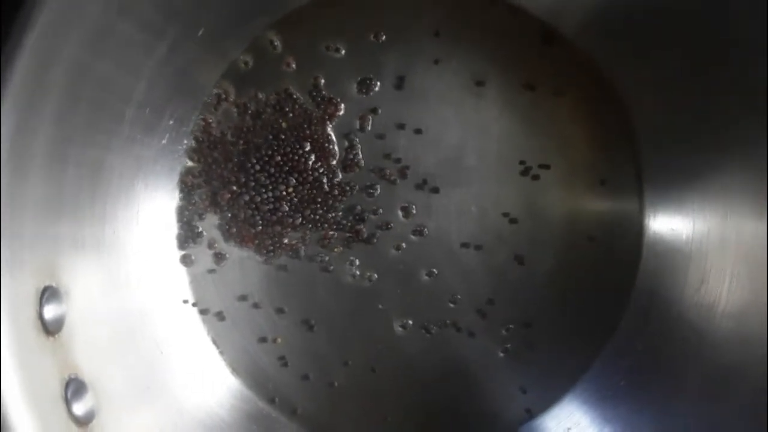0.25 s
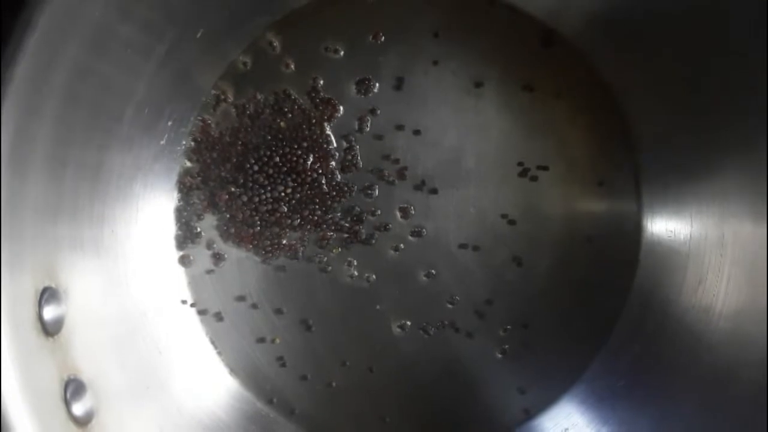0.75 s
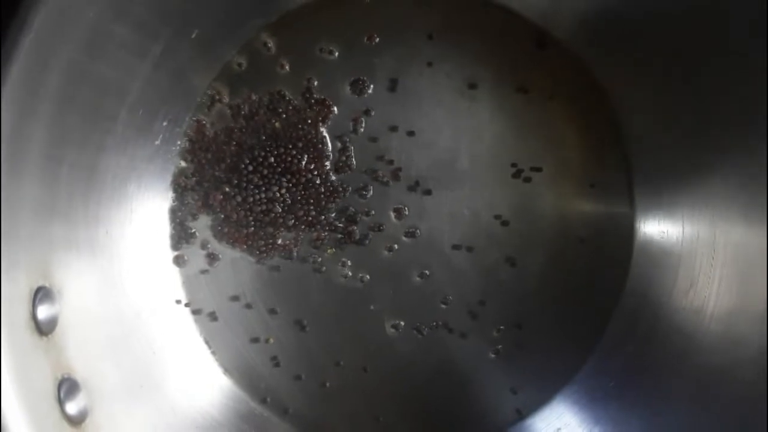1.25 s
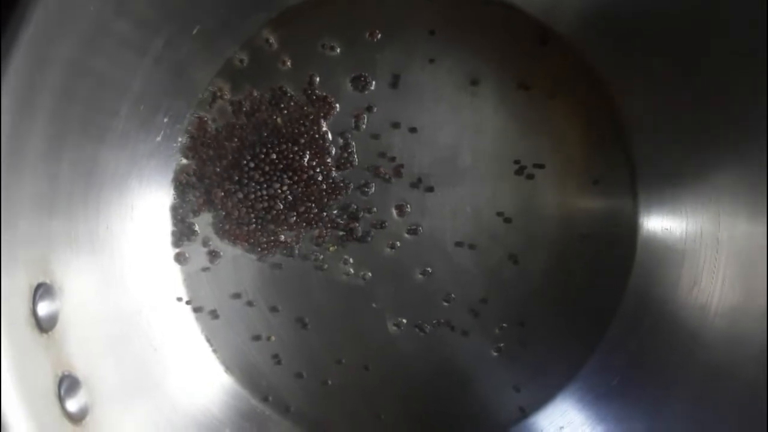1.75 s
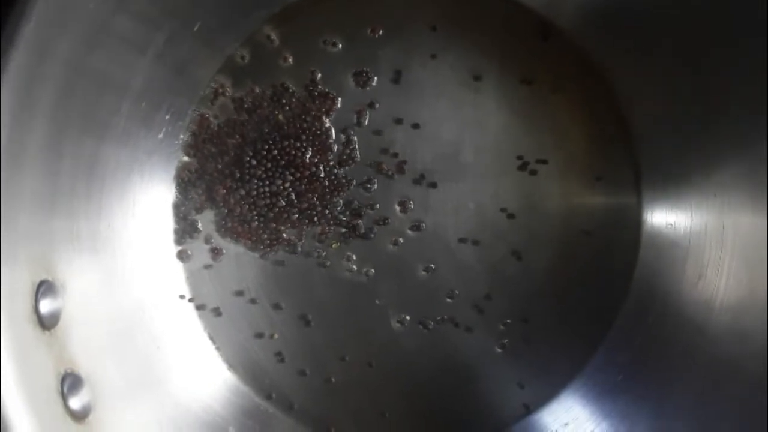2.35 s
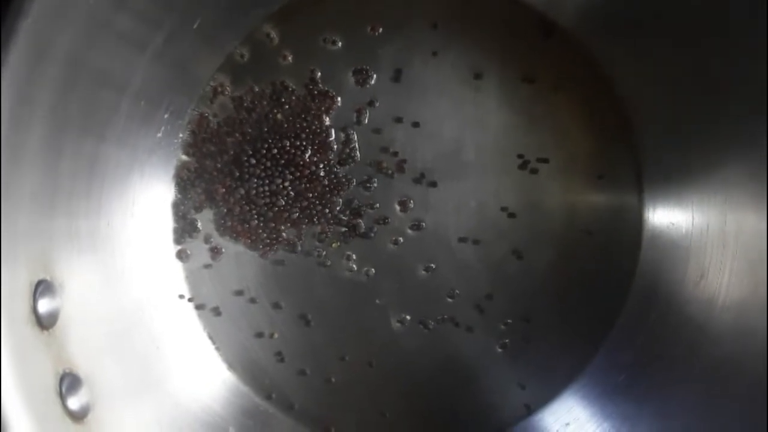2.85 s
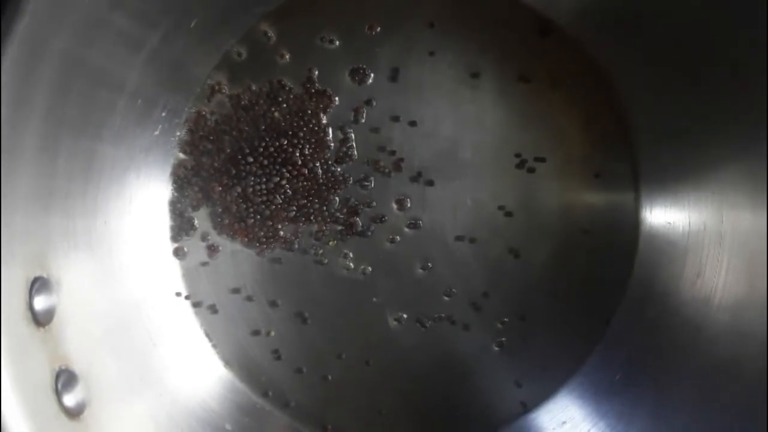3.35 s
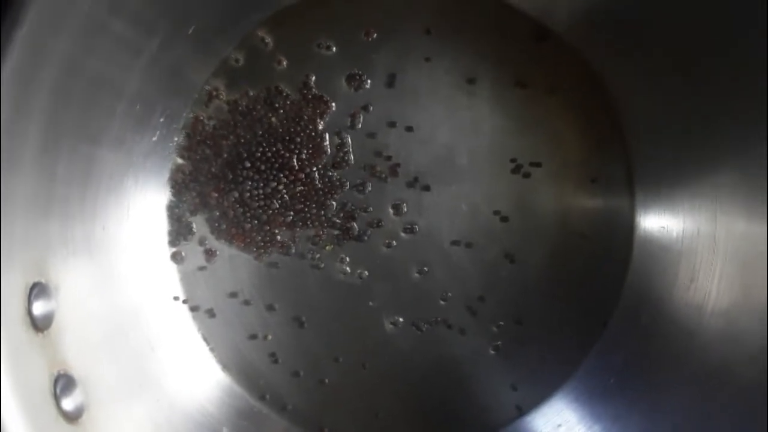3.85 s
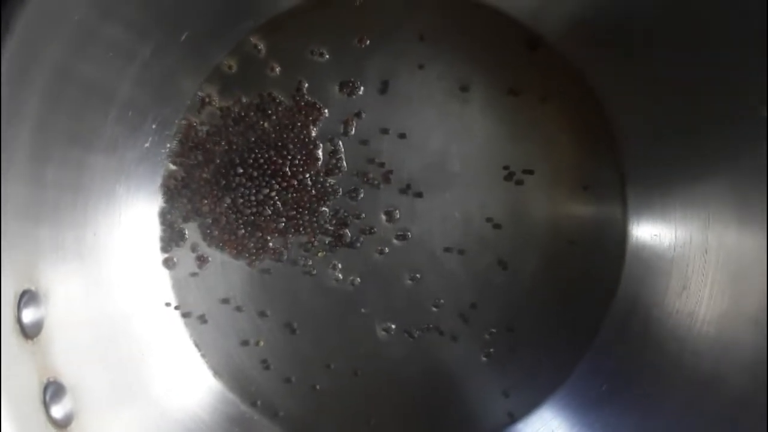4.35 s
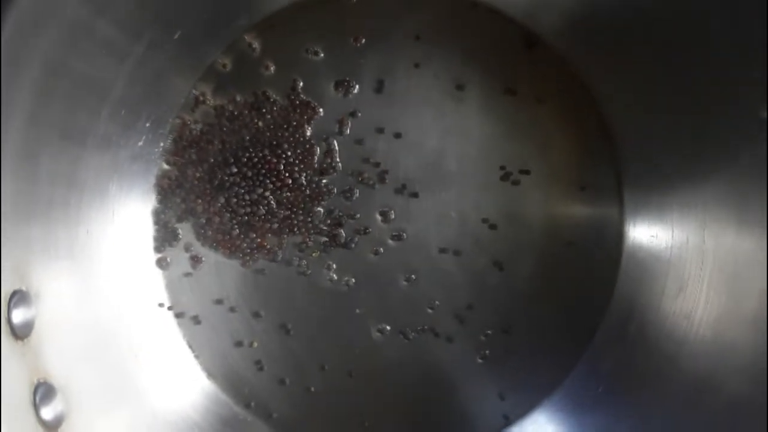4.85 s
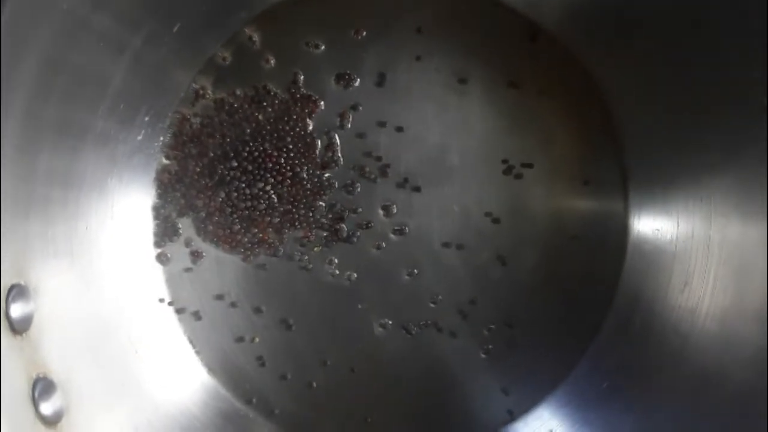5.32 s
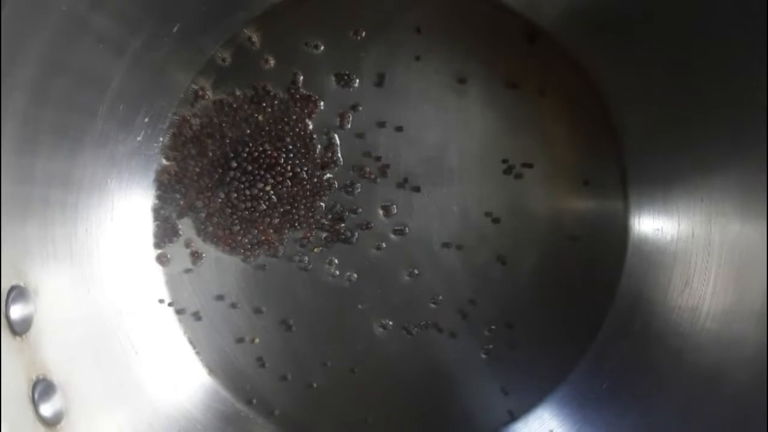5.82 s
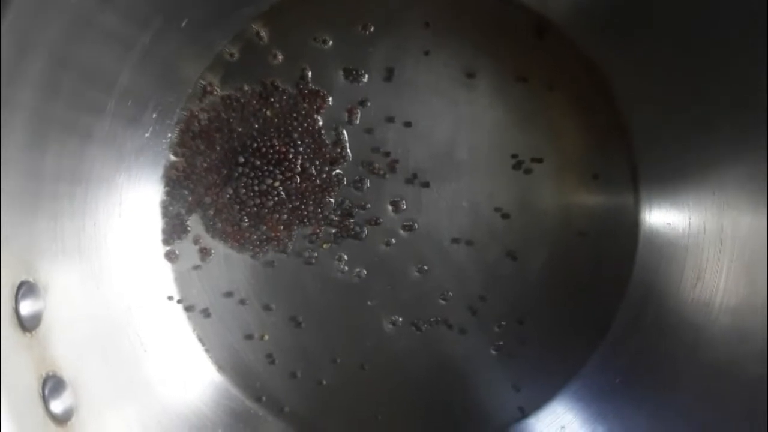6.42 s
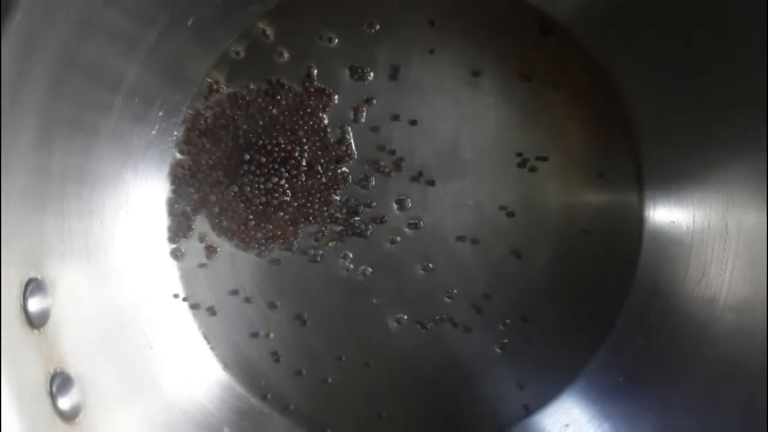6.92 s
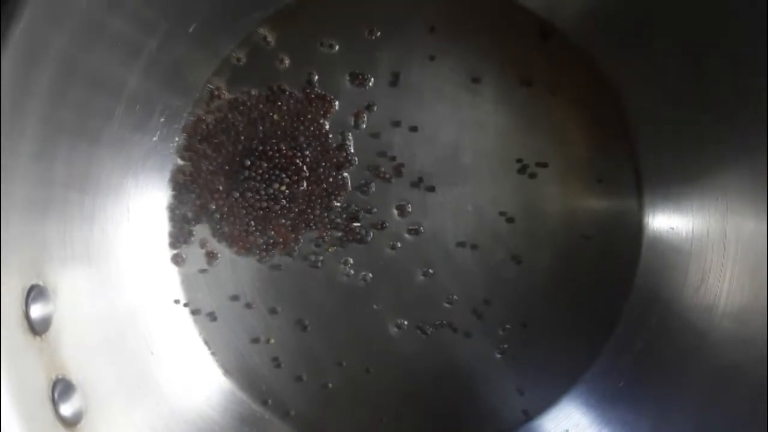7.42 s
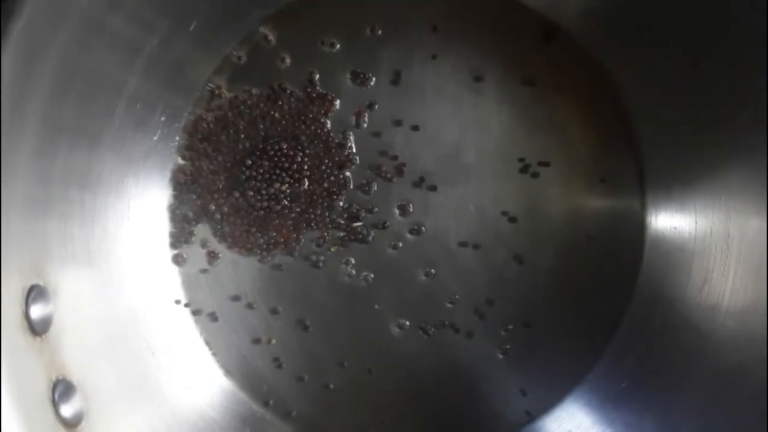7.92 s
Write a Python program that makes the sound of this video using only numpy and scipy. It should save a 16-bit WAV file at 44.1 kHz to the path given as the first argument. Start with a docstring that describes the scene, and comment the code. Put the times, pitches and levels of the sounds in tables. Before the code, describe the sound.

Close over a deep steel pot in a bare home kitchen, with constant low rumble and faint hiss. At first it is nearly quiet, with a tiny spurt near 0.2 s, then a tight flurry of seed pops and sizzle from 0.6 to 1.0 s. After a short gap, light crackles and a soft fry return from 1.4 to 2.0 s, with a plop near 1.9 s. Small spits and bubble plops gather between 2.3 and 3.4 s. From 3.8 s popping becomes dense and thumpier, peaking around 4.2 to 4.5 s with a strong sizzle and the loudest plop. Another surge with sharp snaps runs 4.9 to 5.3 s, then a lull. Near 5.9 s boiling bursts up, peaks at 6 s, dips around 6.5 s, and continues as steadier sizzling with scattered cracks, one strong at 7.5 s, until about 8.2 s. Every pop has a short metallic rattle and room tail.

```python
"""A low rumble and faint hiss run throughout, under pitched plops, seed pops and surges of sizzling.
Mustard seeds fry in hot oil in a deep steel pot: shaped noise bursts make each pop and spit.
Dense random bursts make the sizzle, in short surges over a boil that takes hold near 6 s.
Plops are decaying sines. Noise echoes carry the rattle of the steel wall and the bare kitchen's tail."""
import sys
import numpy as np
from scipy import signal
from scipy.fft import rfft, irfft, next_fast_len
from scipy.io import wavfile
from scipy.ndimage import map_coordinates

SR = 44100
rng = np.random.default_rng(int(sys.argv[2]) if len(sys.argv) > 2 else 0)


def log_audio(samples):
    """Write samples as a 16-bit WAV file to the path given in sys.argv[1]."""
    # one column per channel
    frames = np.atleast_2d(samples).T
    # limit to full scale, then quantise
    limited = np.clip(frames, -1, 1)
    pcm = np.round(limited * 32767).astype(np.int16)
    wavfile.write(sys.argv[1], SR, pcm)


N = 360738  # length [samples]

# rumble spectrum, relative: (frequency [Hz], level [dB])
RUMBLE_SPECTRUM = [(15, -55), (25, -37), (40, -12), (65, -12.5), (92, 1.5), (125, -4), (160, -9.5),
                   (300, -16.5), (800, -79)]
# drift of the rumble, before its offset: (time [s], level [dB])
RUMBLE_DRIFT = [(0, -67.5), (0.25, -63), (0.75, -71), (1.8, -65.5), (2.2, -68.5), (5.3, -70), (7.3, -72.5),
                (8.18, -69)]
# hiss spectrum, relative: (frequency [Hz], level [dB])
HISS_SPECTRUM = [(200, -8.5), (400, -5), (800, -9.5), (1400, -10), (2150, -17.5), (3000, -22), (4200, -21),
                 (5000, -7.5), (5700, -4.5), (6700, -14.5), (8400, -61), (10000, -22.5), (12000, -9),
                 (15500, -9)]
# bursting large bubbles: (time [s], peak before the mix [dB], pitch [Hz])
PLOPS = [(0.096, -48, 2100), (0.459, -48, 1610), (1.396, -49, 2480), (1.939, -31.5, 2400),
         (2.356, -38.5, 1440), (2.726, -42, 2240), (2.855, -35, 1490), (3.092, -31.5, 1260),
         (3.263, -33.5, 1245), (3.342, -24.5, 2010), (3.514, -43.5, 2580), (3.992, -26, 1520),
         (4.457, -17, 1610), (5.231, -25.5, 2230), (5.756, -49, 2150), (6.770, -23, 2290)]
# steam surges: (time [s], seething [dB], hold [s], splutter offset [dB], fizz offset [dB])
SURGES = [(0.23, -59, 0.013, -0.5, -6.5), (0.47, -72.5, 0.1, 7.5, -10), (0.759, -52.5, 0.16, 7.5, 0),
          (1.15, -69.5, 0.06, -11, 9), (1.62, -63.5, .04, -4, 6.5), (1.718, -55, 0.33, -0.5, 2.5),
          (2.362, -57.5, 0.16, -4.5, 0), (2.839, -49, 0.039, 0, 1), (3.08, -51.5, 0.19, 1, 1.5),
          (3.50, -60, 0.028, 4, -18), (3.868, -50, 0.33, -0.5, 1), (4.348, -39.5, 0.1, 1, 5.5),
          (4.62, -61, 0.017, 15, -7), (4.79, -64, 0.044, -6, 7), (4.889, -47.5, 0.38, 0.5, 2),
          (5.552, -75, 0.026, -8, -13)]
# boil beneath the surges: (time [s], seething [dB])
BOIL = [(0, -79.5), (5.71, -81), (5.85, -44), (5.99, -34.5), (6.12, -40.5), (6.27, -42), (6.5, -51),
        (6.95, -45), (7.35, -43.5), (7.8, -42.5), (8.18, -46)]
# louder seeds: (time [s], echo level before pot and mix [dB], direct crack over the echo [dB],
# then against the snap: thump [dB], knock [dB], air [dB])
LOUD_POPS = [ (0.598, -15, -4, -6, -10, -12), (0.603, -8.5, -16, 1, 2.5, -9),
             (0.635, -13.5, -19, -1, 10.5, -9), (0.722, -17.5, -3.5, -7, 5.5, -1),
             (0.769, -20.5, 6.5, -6, 9, -6), (0.789, -6.5, -3.5, -18, -13, 1.5),
             (0.804, -16.5, 1.5, -1, 20, -9), (0.891, -19, -0.5, 0, 18.5, -2),
             (0.903, -4.5, -12, -8, -18, -7), (0.927, -4, -11, -7, -18, -10), (0.944, -1, -0.5, 1, 2, 3),
             (0.991, -10.5, -5, 2, 6, -12), (1.397, -21, -11, -10, -24, -13),
             (1.600, -19, -20, 2, -18, -12), (1.730, -11.5, -4, -2, -8.5, -9),
             (1.770, -8, -12, -6, -8, -4.5), (1.799, -20, 2, 7, -3, -4), (1.866, -23, -2, 5, -5, -7),
             (1.911, -11, -23, 4, -7, -4), (1.940, -10.5, -7, -4, -0.5, -5),
             (2.295, -19.5, 5.5, -8, -16, -5), (2.503, -10, -29, -11, -2, -9),
             (2.518, -11, -20, -4, 5.5, -7), (2.540, -12, -3.5, 5, 8.5, -8), (2.811, -9, -27, -27, -9, -12),
             (2.869, -8.5, -2.5, -21, -4.5, -20), (3.077, -1, -16, 5.5, -12, -9.5),
             (3.249, -8, -26, 5, -8, -22), (3.318, -2.5, -19, 0, -3, -8.5), (3.340, -12.5, -1, 8, 3.5, -21),
             (3.843, -11.5, -23, 15, 1.5, -4), (3.870, -7.5, -21, 7, 1, -12), (3.908, -5.5, -0.5, 5, 0, -8),
             (3.992, -29, -10, 13, 21, -11), (4.017, -14, 8, 3, 4.5, -10), (4.061, -8, -4, 12.5, 8, -9),
             (4.158, -14, -4, -8, 8, -14), (4.166, -14, -2, 13, 10, 1), (4.183, -3, -3, 8.5, 1.5, -4),
             (4.225, -21.5, -5, -13, 17, -12), (4.288, -1, -15, 7, 4.5, -4), (4.309, 0.5, -24, 11, 6.5, 2),
             (4.351, 3.5, -16, 3, -8, 2), (4.390, -0.5, -21, 10, 8.5, 4.5),
             (4.458, -0.5, -6.5, 19.5, 8.5, 1), (4.470, 3, -5, 9, -12.5, -17),
             (4.618, 0.5, -3, -17, -18, -4.5), (4.899, -0.5, -38, 3, -1.5, -7),
             (4.959, -15.5, 0, -15, 6.5, 1), (5.031, -19, 4, -8, 0, 2), (5.077, 3, -6, -13, -4.5, 1),
             (5.141, -12, 1, -6, -11, -3), (5.156, -11, -0.5, -11, 1.5, 0), (5.230, -5.5, -2, 8, 0, 2),
             (5.339, 1, -22, 4.5, -4.5, 5.5), (5.344, 1, -9.5, 1, -23, -19),
             (6.301, -11.5, 0.5, -13, -3, -7), (6.618, -6.5, -11, -7, 8, -1),
             (6.626, -23, 6.5, -13, 10, -1), (6.662, -30.5, 14, -1, 13, -3), (6.726, 0.5, 0, -23, -29, -11),
             (6.770, -10, -4, -12, 2, 2), (6.785, -3.5, -8, -24, 2, -2), (6.832, -5, -24, -6, 4.5, -6),
             (7.051, -2.5, -8, -23, 3.5, -10), (7.099, -2.5, -6, -6, 9.5, 0),
             (7.411, -11, -3.5, -52, 9, -2), (7.526, -3, -22, -1, 9.5, -2), (7.543, 4, -9, 1, -2, -4),
             (7.748, -17, -15, 1, 9, -1), (7.768, -8, -7.5, -16, 7.5, -6), (7.846, -6, -7, -44, 6, -6),
             (7.927, -10.5, 4, -11, -1, -30), (8.121, -24, -2, -3, 20.5, -23)]
# centres of a seed's colour bands: thump, knock, body, snap, air [Hz]
COLOUR_HZ = [300, 950, 2200, 5400, 12500]
# broad tone of the pot, relative: (frequency [Hz], level [dB])
POT_TONE = [(120, -28.5), (300, -21.5), (600, -13.5), (900, -10.5), (1400, -1.5), (2200, -1.5),
            (3000, -5.5), (3700, -9.5), (5500, 0.5), (7000, -9.5), (8700, -25), (11000, -15.5),
            (14000, -12), (15500, -7.5)]
# narrow pot resonances: (frequency [Hz], width [Hz], level over the broad tone [dB])
POT_MODES = [(240, 15, 0), (432, 49, -2.5), (763, 23, -2.5), (925, 3.2, 4), (1066, 3.1, 4.5),
             (1293, 59, -8.5), (1580, 2.8, -5), (1540, 4.8, -17), (1907, 10, 2), (2052, 17, 4),
             (2208, 71, -2), (2657, 10.3, 3.5), (2816, 21, -1.5), (4810, 29, -3)]

SWELL_DB_PER_S, EBB_DB_PER_S = 129, 208
FULL_BOIL_DB = -46.5  # reference seething
FIZZ_DB, FIZZ_DB_PER_DB = -47.5, 0.84  # fizz at full boil, growth per dB of seething
UNREST_DB, UNREST_PER_S = 2.5, 14  # random flicker of the seething
BODY_DB, BODY_DB_PER_DB = -1, 0.47  # body of a pop: offset, growth per dB of knock
# faint seeds: echo level at full boil, growth per dB of seething, scatter
SMALL_DB, SMALL_DB_PER_DB, SMALL_SPREAD_DB = -22.5, 0.75, 1
SMALL_CRACK_DB, SMALL_THUMP_DB, SMALL_AIR_DB = -4, -15, -10
SMALL_KNOCK_DB, SMALL_KNOCK_SPREAD_DB = 0.5, 5.5
TOP_HZ = 16000  # band limit


def amp(db):
    """Decibels to gain."""
    return 10 ** (np.asarray(db) / 20)


def unit(x):
    """Scale to rms 1."""
    return x / np.sqrt(np.mean(x ** 2) + 1e-20)


def along(points, hz):
    """(Hz, value) points read on a log axis."""
    point_hz, values = np.transpose(points)
    return np.interp(np.log(hz + 1), np.log(point_hz + 1), values)


def filtered(x, response):
    """x times a complex response of frequency."""
    size = next_fast_len(N + SR // 4)
    hz = np.fft.rfftfreq(size, 1 / SR)
    return irfft(rfft(x, size) * response(hz), size)[..., :N]


def causal(points, size=1024):
    """Minimum-phase impulse response of a (Hz, dB) colour, via the folded cepstrum."""
    gain = amp(along(points, np.fft.rfftfreq(size, 1 / SR)))
    cepstrum = irfft(np.log(gain))
    cepstrum[1:size // 2] *= 2
    cepstrum[size // 2 + 1:] = 0
    return irfft(np.exp(rfft(cepstrum)))


def add(track, start, sound):
    """Mix a sound into the track from a given sample on."""
    start = min(max(start, 0), N)
    track[start:start + len(sound)] += sound[:N - start]


def wobble(per_s):
    """A smooth random curve of rms roughly 1."""
    knots = rng.standard_normal(int(N * per_s / SR) + 4)
    return map_coordinates(knots, [np.arange(N) * per_s / SR])


def dying(t60_s, size=28000):
    """Exponential envelope of energy 1."""
    envelope = np.exp(-np.log(1000) * np.arange(size) / SR / t60_s)
    return envelope / np.linalg.norm(envelope)


def echo_shape(wall_t60_s, room_t60_s, room_db):
    """Envelope of energy 1: the rattle round the steel wall plus the kitchen's tail."""
    power = dying(wall_t60_s) ** 2 + (amp(room_db) * dying(room_t60_s)) ** 2
    return np.sqrt(power / power.sum())


def echoes(shape, clump_db, clump_t60_s, size=40):
    """Noise echoes from one spot in the pot: the first come in clumps, focused by the round wall."""
    n = np.arange(len(shape))
    knots = n[::size]
    clumps = np.interp(n, knots, rng.standard_normal(len(knots)))
    fade = np.exp(-np.log(1000) * n / SR / clump_t60_s)
    envelope = shape * amp(clump_db * clumps * fade)
    return rng.standard_normal(len(n)) * envelope / np.linalg.norm(envelope)


def steady(spectrum, db, side_db):
    """Even noise of a given spectrum, nearly the same in both ears."""
    noise = rng.standard_normal((2, N))
    mid, side = unit(filtered(noise, lambda hz: amp(along(spectrum, hz))))
    return amp(db) * (mid + amp(side_db) * np.array([side, -side]))


def plopping_bubbles():
    """The open cavity of a large bubble rings as a decaying sine; wall and room echo it."""
    track = np.zeros(N)
    shape = echo_shape(wall_t60_s=0.029, room_t60_s=0.48, room_db=-1)
    decay = dying(t60_s=0.012, size=1500)
    t = np.arange(len(decay)) / SR
    decay = decay * (1 - np.exp(-t / 0.00011))  # the film takes a moment to tear
    for time_s, peak_db, pitch_hz in PLOPS:
        # a small source radiates its rate of change
        ring = np.gradient(decay * np.sin(2 * np.pi * pitch_hz * t))
        plop = signal.fftconvolve(echoes(shape, clump_db=4.0, clump_t60_s=0.27), ring)
        add(track, round(time_s * SR), amp(peak_db) * plop / np.abs(plop).max())
    return track


def shares(seething_db):
    """Levels of simmer, splutter and fizz [dB] at a given seething."""
    fizz_db = FIZZ_DB + FIZZ_DB_PER_DB * (seething_db - FULL_BOIL_DB)
    return np.array([seething_db, seething_db, fizz_db])


def seething():
    """Drive of simmer, splutter and fizz [dB per sample]: steam surges swell, hold and ebb over the boil."""
    t = np.arange(N) / SR
    levels_db = shares(np.interp(t, *np.transpose(BOIL)))
    for time_s, db, hold_s, splutter_db, fizz_db in SURGES:
        swell_db = SWELL_DB_PER_S * np.maximum(time_s - t, 0)
        ebb_db = EBB_DB_PER_S * np.maximum(t - time_s - hold_s, 0)
        surge_db = shares(db - swell_db - ebb_db) + np.array([[0], [splutter_db], [fizz_db]])
        levels_db = np.maximum(levels_db, surge_db)
    return levels_db + UNREST_DB * wobble(UNREST_PER_S)


def bubbles(level_db, colour, rate_per_s, growth, spread_db, size=6000):
    """Tiny bursts at random moments; the harder the oil seethes, the more of them."""
    level = amp(level_db)
    chance = np.clip(rate_per_s / SR * unit(level) ** growth, 1 / SR, 1)
    spread = np.clip(rng.standard_normal(N), -2, 2)
    sizes = amp(spread_db * spread) * rng.choice([-1, 1], N)
    hits = rng.random(N) < chance
    bursts = level * unit(hits * sizes / np.sqrt(chance))  # density leaves the level alone
    shape = echo_shape(wall_t60_s=0.1, room_t60_s=0.18, room_db=-5.0)
    track = np.zeros(N)
    for start in range(0, N, size):  # fresh echoes per block: the seething wanders about the heap of seeds
        spot = echoes(shape, clump_db=2.5, clump_t60_s=0.26)
        add(track, start, signal.fftconvolve(bursts[start:start + size], spot))
    return signal.oaconvolve(track, causal(colour))[:N]


def sizzling_oil(coarse_db, low_db, fine_db):
    """Coarse bubbles simmer in a narrow band and splutter lower; fine ones fizz above them."""
    simmer_db = coarse_db - 0.15 * (coarse_db + 33.0)  # lingers in the lulls
    splutter_db = low_db + 0.2 * (low_db + 51.0)  # grows faster than the boil as a whole
    # colours: (frequency [Hz], level [dB])
    simmer_colour = [(900, -29.5), (1700, -9.5), (2150, 0), (2550, 1.5), (3300, -26), (8000, -38)]
    splutter_colour = [(300, -4.5), (600, -9.0), (1000, 1.5), (1550, 2.0),
                       (2150, -5.0), (3000, 3), (4500, -7.5), (8000, -31.0)]
    fizz_colour = [(1200, -8), (2800, -0.5), (4000, 0.5), (7000, 2), (12000, -2.5)]
    simmer = bubbles(simmer_db, simmer_colour, rate_per_s=3000, growth=0.5, spread_db=5.0)
    splutter = bubbles(splutter_db, splutter_colour, rate_per_s=3000, growth=0.62, spread_db=7.5)
    fizz = bubbles(fine_db, fizz_colour, rate_per_s=4500, growth=0.45, spread_db=8.5)
    return simmer + splutter + fizz


def small_pops(seethe_db, count=90):
    """Rows for the faint seeds: at random moments, stronger while the oil seethes."""
    at = rng.integers(0, N, count)
    strength, hollow = np.clip(rng.standard_normal((count, 2)), -2, 2).T
    below_boil_db = np.minimum(seethe_db[at] - FULL_BOIL_DB, 0)
    echo_db = SMALL_DB + SMALL_DB_PER_DB * below_boil_db + SMALL_SPREAD_DB * strength
    knock_db = SMALL_KNOCK_DB + SMALL_KNOCK_SPREAD_DB * hollow
    return [(time_s, level, SMALL_CRACK_DB, SMALL_THUMP_DB, knock, SMALL_AIR_DB)
            for time_s, level, knock in zip(at / SR, echo_db, knock_db)]


def crack(t60_s, rise_s, bounce_s, bounce_db, rattle_t60_s, rattle_db, size=1400):
    """The split of a husk, of energy 1: a sharp burst, one bounce across the pot, a short rattle."""
    t = np.arange(size) / SR
    burst = dying(t60_s, size) * (1 - np.exp(-t / rise_s)) ** 2
    burst /= np.linalg.norm(burst)
    bounce = amp(bounce_db) * np.interp(t - bounce_s, t, burst, left=0)
    rattle = amp(rattle_db) * dying(rattle_t60_s, size)
    envelope = np.sqrt(burst ** 2 + bounce ** 2 + rattle ** 2)
    sound = rng.standard_normal(size) * envelope
    return sound / np.linalg.norm(sound)


def spot_colour(band_db, ripple_db, count):
    """A seed's own colour, rippled because each spot stirs the pot's air resonances differently."""
    hz = np.linspace(0, SR / 2, count)
    ripple = ripple_db * np.clip(rng.standard_normal(count), -2, 2)
    bands = along(list(zip(COLOUR_HZ, band_db)), hz)
    return causal(np.transpose([hz, bands + ripple]))


def popping_seeds(pops):
    """Each husk splits with a dry crack, or spits softly from under the oil; wall and room echo it."""
    track = np.zeros(N)
    shape = echo_shape(wall_t60_s=0.105, room_t60_s=0.55, room_db=2.5)
    build_up = 1 - np.exp(-np.arange(len(shape)) / SR / 0.00086)  # echoes need a moment to gather
    for time_s, echo_db, crack_db, thump_db, knock_db, air_db in pops:
        pop = echoes(shape * build_up, clump_db=4.5, clump_t60_s=0.63)
        split = crack(t60_s=0.0026, rise_s=0.00017, bounce_s=0.00346, bounce_db=-8,
                      rattle_t60_s=0.007, rattle_db=-8)
        add(pop, 0, amp(crack_db) * split)
        body_db = BODY_DB + BODY_DB_PER_DB * knock_db
        colour = spot_colour([thump_db, knock_db, body_db, 0, air_db], ripple_db=3, count=112)
        add(track, round(time_s * SR), amp(echo_db) * signal.fftconvolve(pop, colour))
    return track


def pot_ring(hz):
    """Unity plus one band-pass resonance per pot mode."""
    response = 1
    for mode_hz, width_hz, db in POT_MODES:
        damping = 1j * hz * width_hz
        response = response + amp(db) * damping / (mode_hz * mode_hz - hz * hz + damping)
    return response


def pot(x):
    """The steel pot colours seeds and sizzle, rings at its own pitches and radiates no deep bass."""
    tone = causal(POT_TONE, size=4096)
    x = signal.oaconvolve(x, tone / np.linalg.norm(tone))[:N]
    x = signal.sosfilt(signal.butter(3, 110, "highpass", fs=SR, output="sos"), x)
    return filtered(x, pot_ring)


def scene():
    """The pot straight ahead, in the kitchen's rumble and the microphones' hiss."""
    seethe_db, splutter_db, fizz_db = seething()
    seeds = popping_seeds(LOUD_POPS + small_pops(seethe_db))
    sizzle = sizzling_oil(seethe_db, splutter_db, fizz_db)
    frying = amp(-1.5) * pot(seeds + sizzle) + amp(-4.0) * plopping_bubbles()
    drift = amp(np.interp(np.arange(N) / SR, *np.transpose(RUMBLE_DRIFT)))
    rumble = drift * steady(RUMBLE_SPECTRUM, db=1.5, side_db=-20)
    hiss = steady(HISS_SPECTRUM, db=-64.5, side_db=-15.0)
    return frying + rumble + hiss


def record(dry):
    """Steep low-pass at the band limit."""
    return filtered(dry, lambda hz: 1 / (1 + (hz / TOP_HZ) ** 160))


dry = scene()
out = record(dry)
log_audio(out)
```